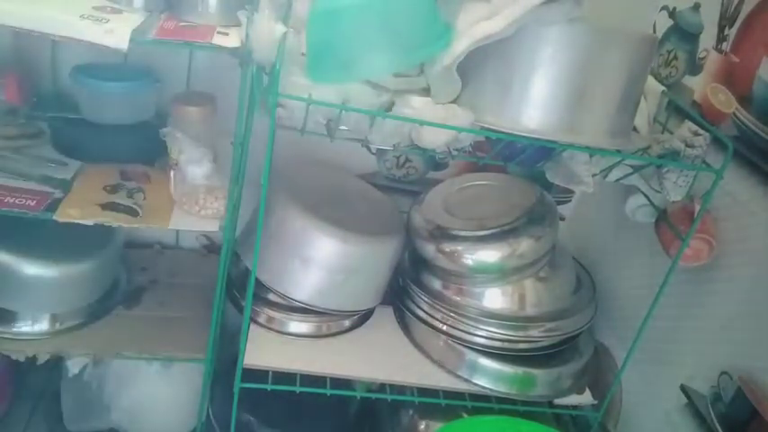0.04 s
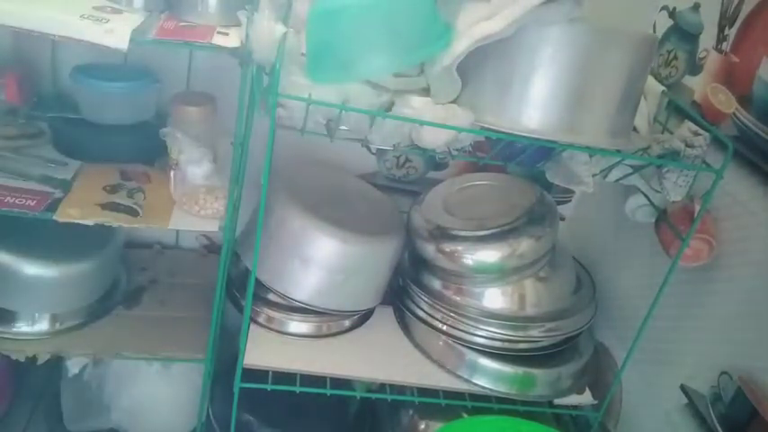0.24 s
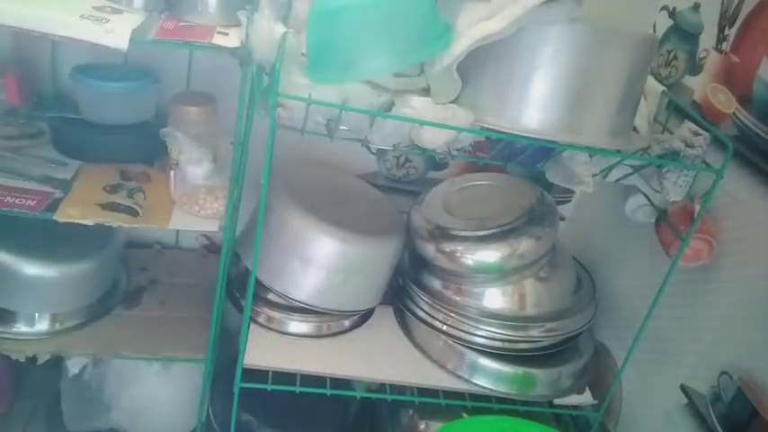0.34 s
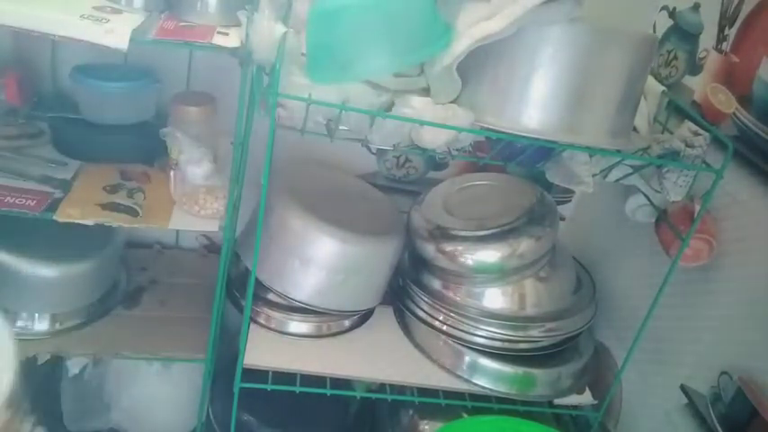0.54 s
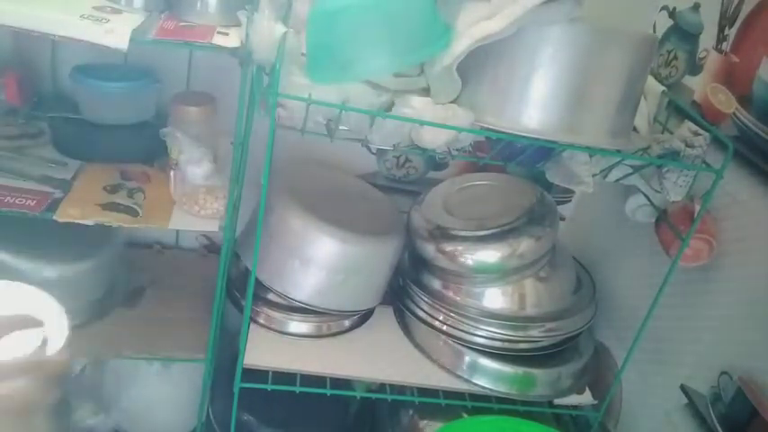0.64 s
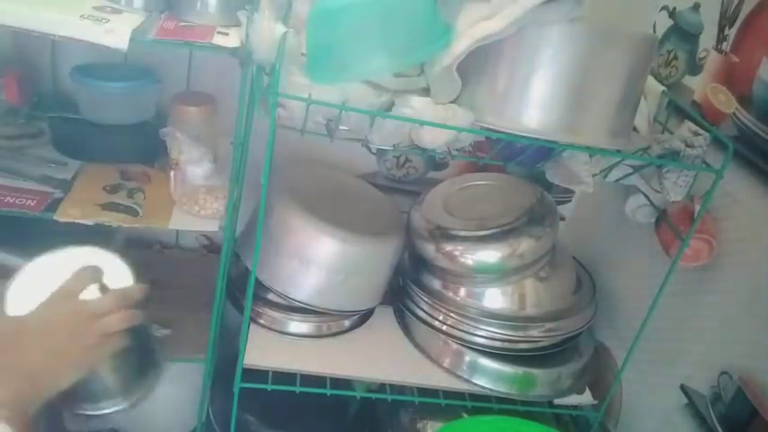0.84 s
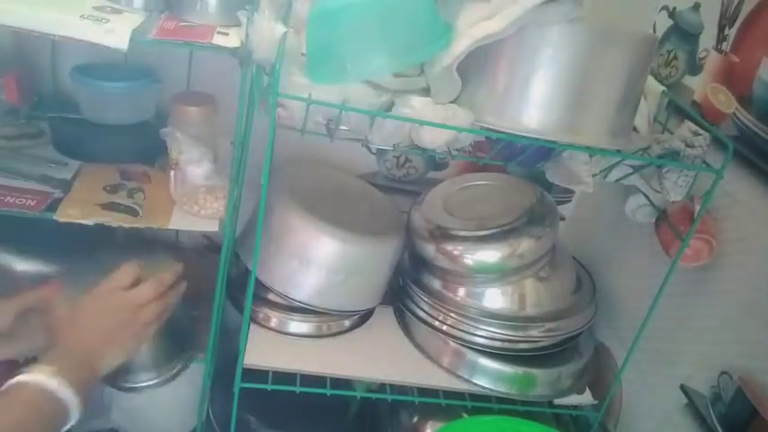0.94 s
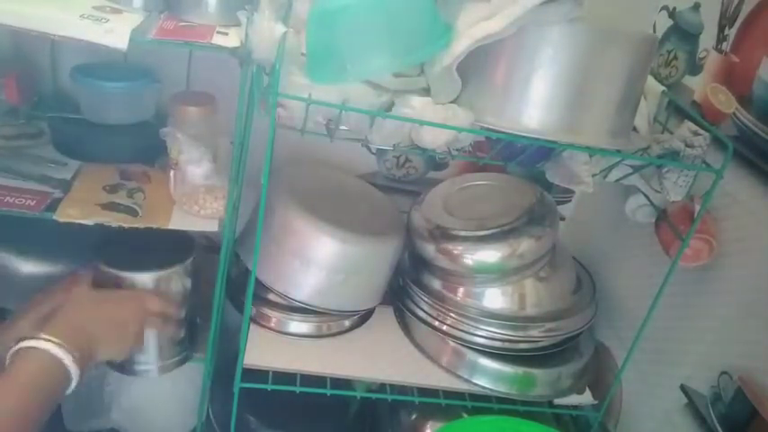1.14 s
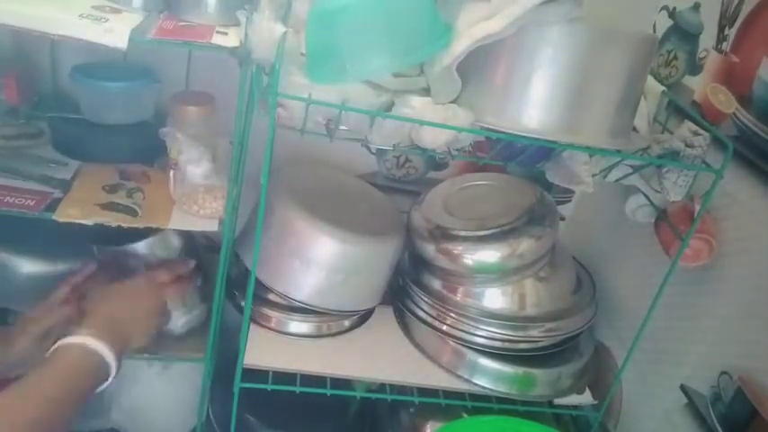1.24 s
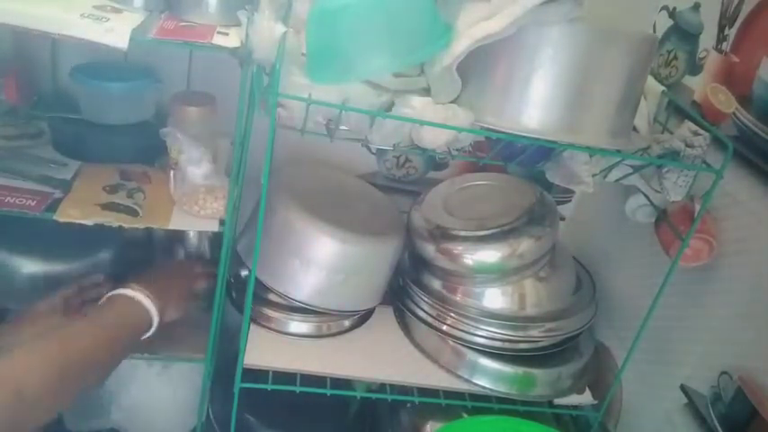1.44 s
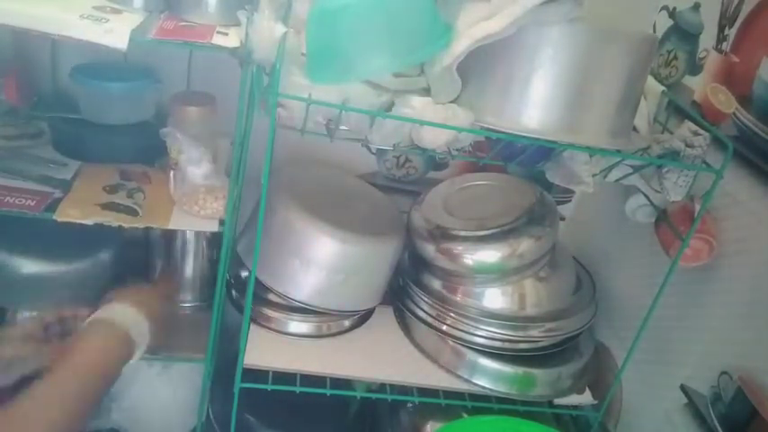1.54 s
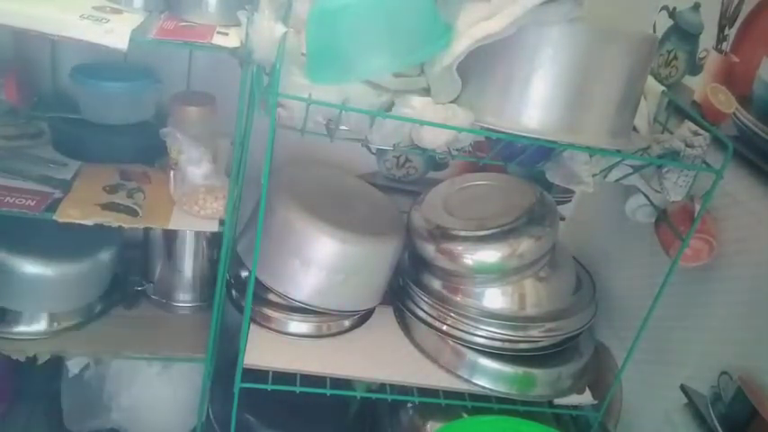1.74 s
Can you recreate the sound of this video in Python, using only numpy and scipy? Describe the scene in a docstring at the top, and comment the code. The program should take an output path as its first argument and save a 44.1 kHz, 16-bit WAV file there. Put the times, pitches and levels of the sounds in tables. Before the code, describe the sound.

Stainless steel kitchenware clanking and clattering as pieces are set down on a kitchen shelf

```python
"""Faint room tone opens, then a light spoon touch swells into a bowl clanking on a pan on a kitchen shelf;
a canister is set down beside them and jostled into place against a tumbler and a plate, all stainless steel.
Each contact layers a noisy crash and a shimmer of dense shell modes, a clang, a shelf knock and a few clear tones;
dull noise thuds, a short reverberation and a low hum lie around them.
The recorder turns quiet sound down, sparing the bass; only its right channel is live."""
import sys
import numpy as np
from scipy import signal
from scipy.fft import rfft, irfft, next_fast_len
from scipy.io import wavfile
from scipy.ndimage import uniform_filter1d

SR = 44100
rng = np.random.default_rng(int(sys.argv[2]) if len(sys.argv) > 2 else 0)


def persist_wave(psi):
    """Save psi, clipped to +-1, as 16-bit WAV."""
    counts = np.round(np.clip(psi, -1, 1) * 32767).astype(np.int16)
    wavfile.write(sys.argv[1], SR, np.atleast_2d(counts).T)


N = 79380
LENGTH = 27000  # samples in one contact, thud or reverberation tail
T = np.arange(LENGTH) / SR
HZ = np.fft.rfftfreq(LENGTH, 1 / SR)
TOP_HZ = 15800  # upper limit of the shell modes and of the recorder

# Background spectra: (frequency [Hz], relative gain [dB])
ROOM_TONE_COLOUR = [(25, -30), (130, -25), (260, -6), (650, -2), (1000, 1.5), (2000, -6.5), (5000, -10.5),
                    (10000, -13.5), (13000, -30)]
HUM_COLOUR = [(30, -26), (100, -22.5), (135, 4.5), (175, -15), (400, -45)]
# Swell of the low hum, ahead of the suppressor: (time [s], level [dB])
HUM_LEVEL = [(0, -90.5), (.8, -90.5), (1.0, -73), (1.8, -68.5)]
ROOM_TONE_DB = -54  # ahead of the suppressor
KITCHEN_T60, KITCHEN_DB = 0.48, -9  # decay in s, tail against the dry ware

# Weight landing on the shelf: (time [s], level before rise and fade [dB])
THUDS = [(0.348, -32.5), (.495, -54.5), (0.903, -42), (1.266, -64), (1.450, -39.5)]
# Spectra of the shelf thud, shelf knock and steel shimmer: (frequency [Hz], relative gain [dB])
THUD_COLOUR = [(25, -14), (80, -17), (150, 1), (220, -2.5), (330, 1), (700, -20.5), (3000, -59)]
SHELF_COLOUR = [(30, -29.5), (100, -33.5), (210, -17.5), (270, 0), (330, -5.5), (375, -3), (430, 3),
                (490, -6.5), (590, 5.5), (780, -9), (1300, -12.5), (4000, -42.5)]
SHIMMER_COLOUR = [(200, -43.5), (900, -15), (2500, -16.5), (3600, -12), (4300, -17), (5100, -10.5),
                  (5900, -2.5), (7600, 0), (9000, -2), (11200, -2.5), (12300, -12.5), (15500, -20.5)]

# Clear modes of each steel piece: (frequency [Hz], typical relative level [dB], decay t60 [s])
BOWL = [(1049, -3, .45), (1727, -2, .3), (3390, -7, .25), (4835, -2, .5), (7590, -7, .3), (7865, -6, .3)]
CANISTER = [(619, -14, .6), (1295, -10, .4), (1513, -10, .6), (1855, -14, .35), (2338, 0, .6),
            (3572, -10, .35), (4920, -14, .6), (5717, -9, .5), (6056, -8, .5), (6415, -8, .5),
            (7537, -9, .5)]
PLATE = [(570, -11, .25), (2111, 0, .45), (2854, -19, .35), (4425, -19, .35), (7074, -11, .35),
         (7400, -11, .25), (8925, -16, .25)]
PAN = [(1047, -6, .5), (1543, 0, .6), (2708, -15, .3), (5787, -6, .3), (6284, 0, .45), (6668, -2, .4),
       (7976, -4, .4), (8540, -5, .4), (8944, -3, .5), (9737, -1, .45), (10935, -7, .45)]
TUMBLER = [(600, -6, .25), (3570, -7, .3), (5717, 0, .45), (6076, -4, .45), (6384, -3, .45), (7648, -3, .4),
           (8235, -4, .4)]
LID = [(692, 0, 0.13), (744, -10, 0.19), (7600, -4, 0.14), (10850, 2, 0.05)]
SPOON = [(5430, -13, 0.075), (6900, 1.5, 0.11), (7290, -7.5, 0.064), (9600, -1, 0.25), (14150, -1, .15)]
# Contacts, with layer levels before rise and fade:
# (time [s], rise time constant [s], shimmer level [dB], shimmer t60 [s], clang level [dB], clang centre [Hz],
#  shelf knock level [dB], ringing piece [mode table], ring level [dB])
CONTACTS = [ (.107, 0.0077, -40.5, 0.26, -61, 1200, -64, SPOON, -34),
            (.160, 0.02, -31.5, 0.14, -55, 1200, -46, SPOON, -39),
            (.186, 0.0018, -33.5, 0.18, -47, 1210, -52, SPOON, -44.5),
            (.1985, 0.0027, -27.5, 0.35, -39.5, 960, -52, BOWL, -38.5),
            (.215, 0.0034, -17.5, 0.37, -17.5, 1030, -41.5, BOWL, -28),
            (.230, 0.00067, -17, 0.6, -23, 3100, -37, BOWL, -31),
            (.258, 0.0017, -27.5, 0.24, -26.5, 3300, -51.5, BOWL, -26.5),
            (.349, 0.00072, -14.5, 0.6, -29.5, 2980, -43, PAN, -37.5),
            (.365, 0.0014, -17, 0.16, -21, 5850, -57, PAN, -33.5),
            (0.441, 0.0087, -27, 0.23, -39, 1150, -43.5, PAN, -31),
            (.588, 0.003, -31, 0.12, -63, 2720, -62, LID, -41.5),
            (.668, .002, -42.5, 0.1, -54, 2500, -56, LID, -37.5),
            (.846, .008, -44, 0.22, -64, 693, -56.5, SPOON, -64.5),
            (.901, 0.0031, -21.5, 0.54, -27, 2790, -24, CANISTER, -23.5),
            (.947, 0.0022, -17.5, 0.57, -27.5, 3240, -35, TUMBLER, -40),
            (.968, 0.0006, -18.5, 0.45, -18.5, 1830, -29, CANISTER, -25),
            (1.038, 0.0048, -25, 0.34, -37, 815, -28.5, CANISTER, -63),
            (1.068, 0.0033, -18.5, 0.29, -42, 1510, -31, TUMBLER, -59),
            (1.185, .001, -19, 0.5, -22.5, 2250, -32, PLATE, -36),
            (1.267, 0.0005, -17, 0.34, -28, 3880, -30.5, TUMBLER, -23.5),
            (1.282, 0.0012, -19, 0.47, -25, 6000, -54.5, TUMBLER, -41.5),
            (1.333, 0.0028, -17.5, 0.27, -29.5, 3330, -36, TUMBLER, -30),
            (1.379, 0.0015, -17.5, 0.39, -38.5, 1980, -41, PAN, -31.5),
            (1.402, 0.0017, -25, 0.18, -19, 1530, -25.5, PLATE, -37.5),
            (1.444, 0.0017, -47, .3, -25, 930, -26, PAN, -28.5),
            (1.46, 0.0029, -17.5, 0.34, -25, 4590, -49, PAN, -49),
            (1.511, 0.0032, -32, 0.48, -33, 1570, -33, PLATE, -27.5),
            (1.594, 0.0086, -44, 0.21, -42, 1690, -39.5, PLATE, -33),
            (1.700, 0.016, -57, 0.098, -38, 1200, -49.5, PLATE, -40), ]

SHELL_MODES, SHELL_LOW_HZ, SHELL_SPREAD_DB = 1200, 499.1, -1.5  # spread scales random mode levels
CRASH_T60, CRASH_DB = 0.14, 2  # s; level of the noisy start against the shimmer
CLANG_OCTAVES, CLANG_FLOOR_DB = 0.58, -21  # width at the middle pitch, level of the skirts
CLANG_MID_HZ, CLANG_NARROWING = 1573, 0.94  # higher clangs are narrower
CLANG_NOISE = .4  # noise in the clang, against its shell modes
CLANG_T60, KNOCK_T60, THUD_T60 = 0.17, 0.25, .08  # s
PATCH_HZ, PATCH_DB = 159.54, 5  # spacing and depth of the groups of modes a contact favours

DEAD_CHANNEL_DB = -103
# Noise suppressor: (input level [dB], gain [dB])
SUPPRESSOR = [(-52, -20), (-42, -12.5), (-35, -6), (-31.5, 0)]
SUPPRESSOR_WINDOW_S, SUPPRESSOR_FROM_HZ = 0.013, 230


def amp(db):
    """Decibels to gain."""
    return 10 ** (np.asarray(db) / 20)


def unit(x):
    """Scale to rms 1."""
    return x / np.sqrt(np.mean(x ** 2) + 1e-20)


def colour(points, hz=HZ):
    """Spectral gain drawn through (frequency, dB) points on a log axis."""
    point_hz, db = np.transpose(points)
    return amp(np.interp(np.log(hz + 1), np.log(point_hz + 1), db))


def noise(gain):
    """Noise of rms 1: random strength and phase at each frequency, shaped by gain."""
    spectrum = rng.standard_normal(len(gain)) + 1j * rng.standard_normal(len(gain))
    return unit(irfft(gain * spectrum))


def fade(t60):
    """Exponential decay, down 60 dB after t60 seconds."""
    return np.exp(-np.log(1000) * T / t60)


def rise(seconds):
    """Soft exponential attack with the given time constant."""
    return 1 - np.exp(-T / max(seconds, 1e-4))


def add(track, s, sound):
    """Mix a sound in at time s, cut off at the end of the track."""
    part = track[max(round(s * SR), 0):][:len(sound)]
    part += sound[:len(part)]


def filtered(x, response):
    """Apply a gain over frequency to x, padded with silence."""
    size = next_fast_len(N + SR // 2)
    gain = response(np.fft.rfftfreq(size, 1 / SR))
    return irfft(rfft(x, size) * gain, size)[..., :N]


def room_tone():
    """Faint coloured noise of the kitchen, with a low noise hum that swells from 0.8 s on."""
    hz = np.fft.rfftfreq(N, 1 / SR)
    hum_db = np.interp(np.arange(N) / SR, *np.transpose(HUM_LEVEL))
    hum = amp(hum_db) * noise(colour(HUM_COLOUR, hz))
    return amp(ROOM_TONE_DB) * noise(colour(ROOM_TONE_COLOUR, hz)) + hum


def kitchen(x, build_s=0.0021):
    """Short reverberation of a small hard room: convolution with decaying noise of unit energy."""
    tail = rng.standard_normal(LENGTH) * fade(KITCHEN_T60) * rise(build_s)
    return signal.fftconvolve(x, tail / np.linalg.norm(tail))[:N]


def thuds(rise_s=0.0028):
    """The shelf takes the weight with a dull, short burst of coloured noise."""
    out = np.zeros(N)
    for s, db in THUDS:
        thud = rise(rise_s) * fade(THUD_T60) * noise(colour(THUD_COLOUR))
        add(out, s, amp(db) * thud)
    return out


def patches(size=128):
    """A random, smooth gain over frequency, set by the spot that is struck."""
    heights = rng.standard_normal(size)
    return amp(PATCH_DB * np.interp(HZ / PATCH_HZ, np.arange(size), heights))


def shell_modes():
    """A dense crowd of modes spread over frequency, with scattered levels and gaps of silence."""
    shell = np.zeros(len(HZ))
    places = (np.arange(SHELL_MODES) + 2 * rng.random(SHELL_MODES)) / SHELL_MODES
    bins = np.searchsorted(HZ, SHELL_LOW_HZ + places * (TOP_HZ - SHELL_LOW_HZ))
    shell[bins] = amp(SHELL_SPREAD_DB * rng.standard_normal(SHELL_MODES))
    return shell


def tones(modes, scatter_db=2.0, waver=0.45, waver_per_s=45):
    """One ring of a piece: decaying sines whose phases waver as it rocks against its neighbours."""
    ring = np.zeros(LENGTH)
    knots = np.linspace(0, T[-1], 200)
    step = waver * np.sqrt(abs(waver_per_s) * knots[1])  # typical phase step in radians
    for hz, db, t60 in modes:
        drift = np.cumsum(rng.standard_normal(len(knots))) * step
        phase = 2 * np.pi * (hz * T + rng.random()) + np.interp(T, knots, drift)
        level = amp(db + scatter_db * rng.standard_normal())
        ring += level * fade(t60) * np.sin(phase)
    power = np.sum(amp([mode[1] for mode in modes]) ** 2) / 2
    return ring / np.sqrt(power)


def contacts():
    """Steel meets steel: each contact crashes, rings the same shell modes anew and knocks the shelf."""
    out = np.zeros(N)
    shell = shell_modes()
    steel, shelf = colour(SHIMMER_COLOUR), colour(SHELF_COLOUR)
    ringing = shell / np.sqrt(np.mean(shell ** 2))
    for s, rise_s, shimmer_db, t60, clang_db, clang_hz, knock_db, piece, ring_db in CONTACTS:
        spot = patches()
        shimmer = noise(shell * steel * spot) * fade(t60)
        crash = amp(CRASH_DB) * noise(steel * spot) * fade(CRASH_T60)
        bright = (shimmer + crash) / np.sqrt(2)

        # Distance from the clang centre, in widths of the hump
        narrowing = (clang_hz / CLANG_MID_HZ) ** CLANG_NARROWING
        distance = np.log2((HZ + 1) / clang_hz) / CLANG_OCTAVES * narrowing
        skirts = amp(CLANG_FLOOR_DB) * np.exp(-abs(distance))
        hump = np.exp(-distance ** 2 / 2) + skirts
        clang = noise(hump * spot * (CLANG_NOISE + ringing)) * fade(CLANG_T60)

        knock = noise(shelf) * fade(KNOCK_T60)
        contact = amp(shimmer_db) * bright + amp(clang_db) * clang
        contact += amp(knock_db) * knock + amp(ring_db) * tones(piece)
        add(out, s, rise(rise_s) * contact)
    return out


def scene():
    """Everything reaches the right channel; the left holds only a trace of hiss."""
    ware = contacts() + thuds()
    live = ware + amp(KITCHEN_DB) * kitchen(ware) + room_tone()
    return np.array([amp(DEAD_CHANNEL_DB) * rng.standard_normal(N), live])


def record(dry):
    """A suppressor turns all but the bass of the live channel down when it gets quiet; then the band limit."""
    dead, live = dry
    window = max(int(SUPPRESSOR_WINDOW_S * SR), 2)
    power = abs(uniform_filter1d(live ** 2, window))
    level_db = 10 * np.log10(power + 1e-14)
    gain_db = np.interp(level_db, *np.transpose(SUPPRESSOR))
    gain = amp(uniform_filter1d(gain_db, window // 2))  # smoothed in dB
    bass = filtered(live, lambda hz: np.exp(-((hz / SUPPRESSOR_FROM_HZ) ** 2) ** 2))
    out = np.array([dead, bass + gain * (live - bass)])
    return filtered(out, lambda hz: np.clip((TOP_HZ - hz) / 300, 0, 1))  # slopes to zero over 300 Hz


dry = scene()
out = record(dry)
persist_wave(out)
```